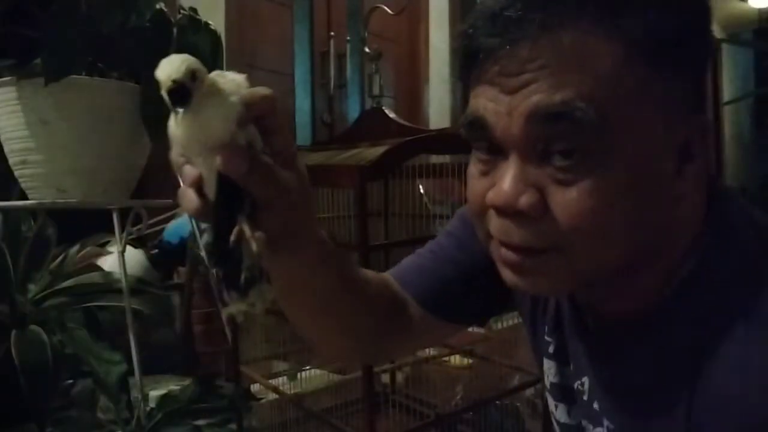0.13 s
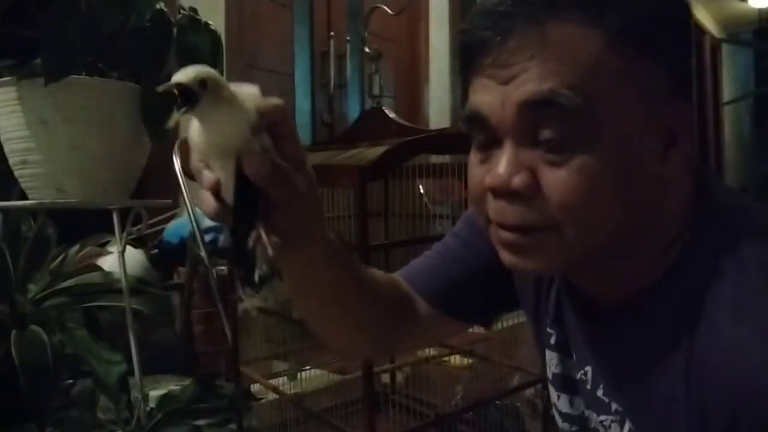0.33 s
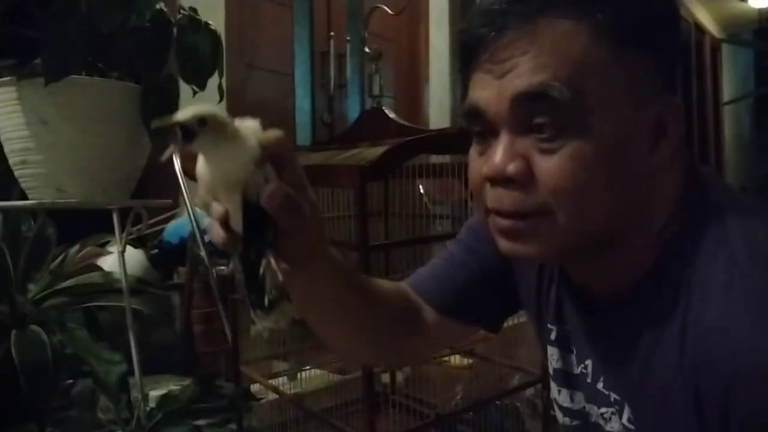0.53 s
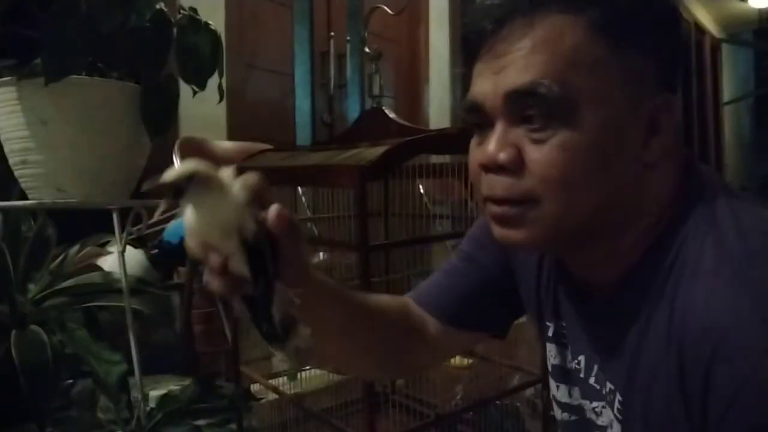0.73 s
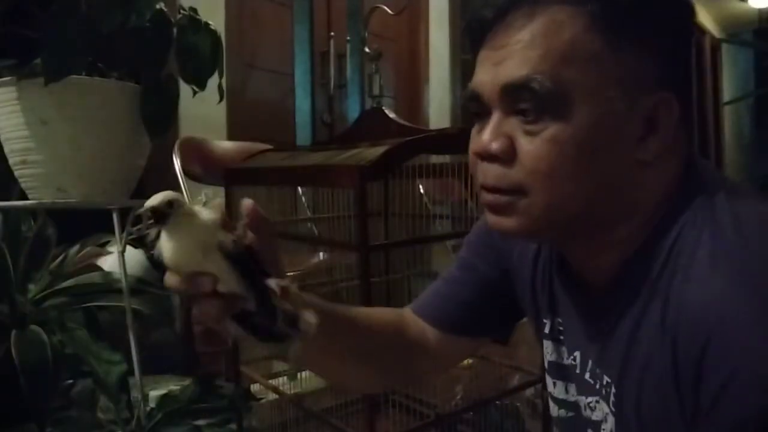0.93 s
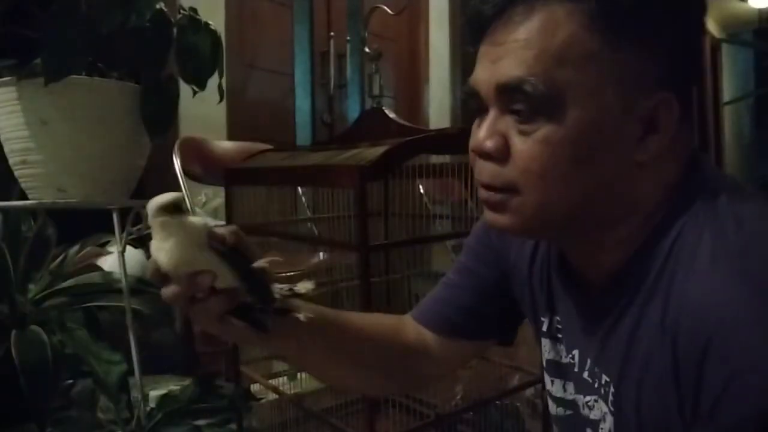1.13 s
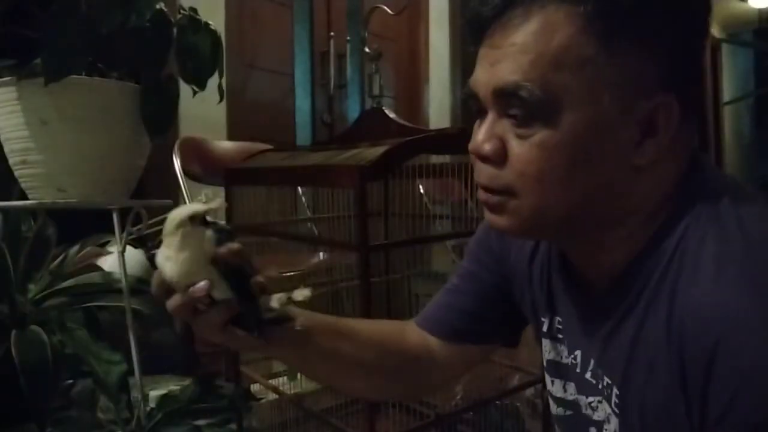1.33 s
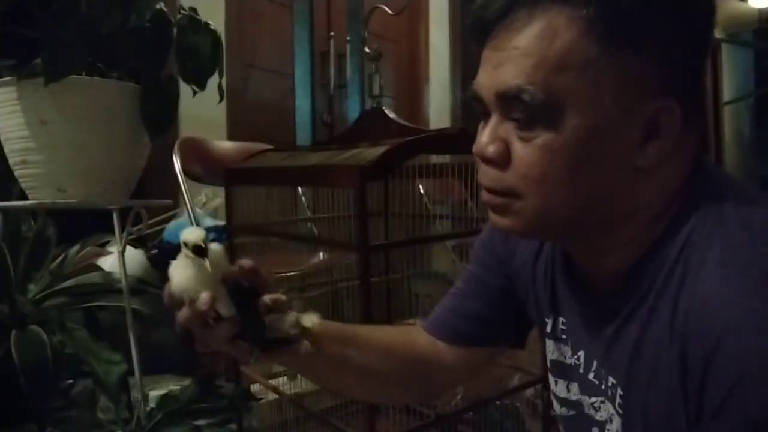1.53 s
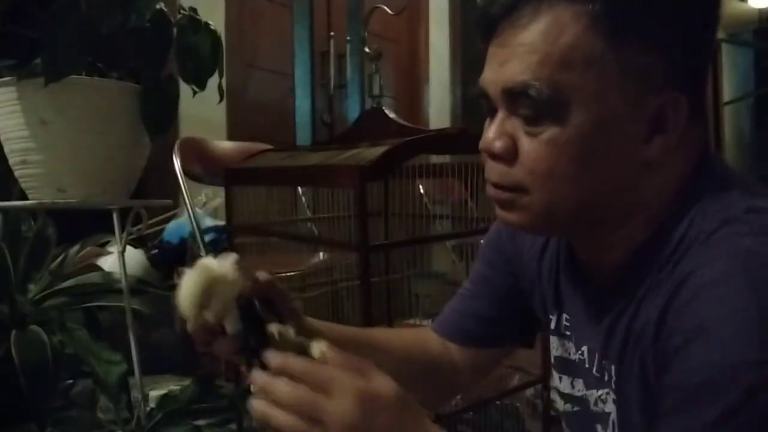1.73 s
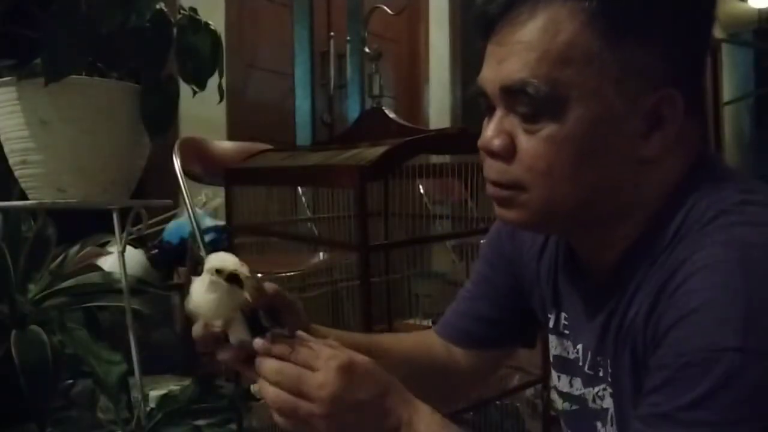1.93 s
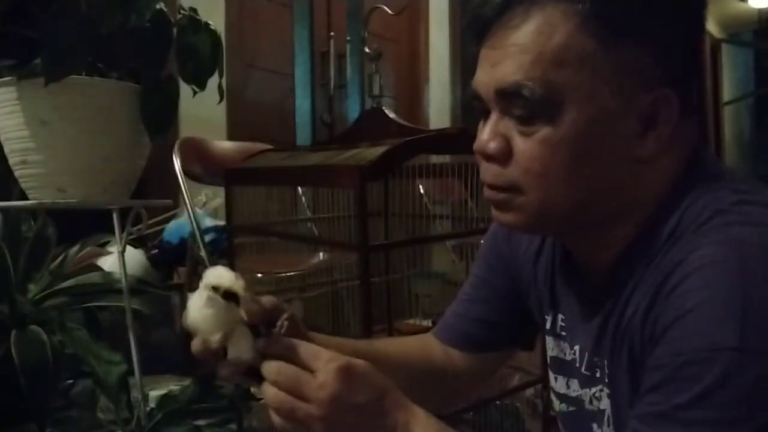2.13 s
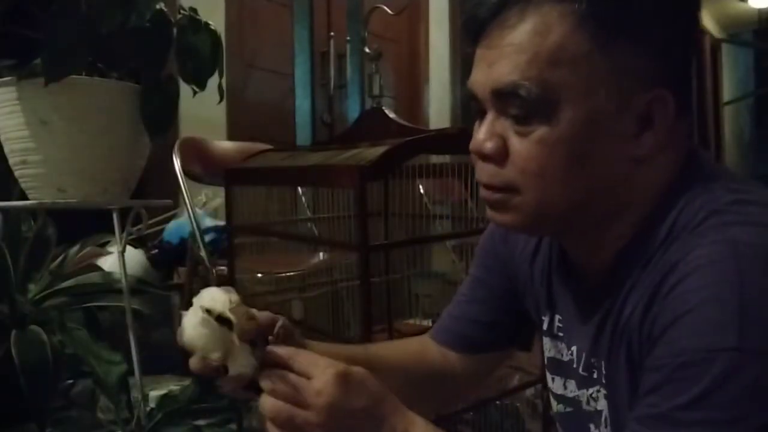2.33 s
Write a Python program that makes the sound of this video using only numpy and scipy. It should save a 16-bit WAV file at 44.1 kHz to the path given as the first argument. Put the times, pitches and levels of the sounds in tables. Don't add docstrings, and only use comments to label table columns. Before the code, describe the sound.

A hand-held myna squawks harshly, close up in a tiled room. At first only soft fan hum, air and hiss, with a feather brush at 0.13 s. From 1.05 s a climbing whistle breaks into a scream at 1.2, growling down until 1.54. A noisy rasp at 1.7 swells into a quavering squawk until 2.1, with beak snaps. A third call starts at 2.34 and is cut off.

```python
import sys
import numpy as np
from scipy import signal
from scipy.fft import rfft, irfft, next_fast_len
from scipy.io import wavfile
from scipy.ndimage import uniform_filter1d, minimum_filter1d, map_coordinates

SR = 44100
rng = np.random.default_rng(int(sys.argv[2]) if len(sys.argv) > 2 else 0)


def unload_audio(sound):
    columns = np.transpose(np.atleast_2d(sound))
    steps = np.round(np.clip(columns, -1, 1) * 32767)
    wavfile.write(sys.argv[1], SR, steps.astype(np.int16))


def magnitude_from_level(level_db):
    exponent = np.asarray(level_db, float) / 20
    return 10 ** exponent


N = 104605


def unit(x):
    return x / np.sqrt(np.mean(x ** 2) + 1e-20)


def along(points, hz):
    f, v = np.transpose(points)
    return np.interp(np.log(hz + 1), np.log(f + 1), v)


def curves(rows):
    s, *cols = np.transpose(sorted(rows))
    return [np.interp(np.arange(N) / SR, s, c) for c in cols]


def wobble(rate):
    return map_coordinates(rng.standard_normal(4000), [np.arange(N) * rate / SR], mode="wrap")


def filtered(x, response):
    m = next_fast_len(N + SR // 2)
    return irfft(rfft(x, m) * response(np.fft.rfftfreq(m, 1 / SR)), m)[..., :N]


# (frequency [Hz], left-right correlation)
LIKENESS = [(60, 0.86), (180, 1), (550, 0.7), (1650, 0.78), (4970, -0.15), (15000, 0.78)]


def rush(spectrum, patchy_db):
    lead_s = 0.00032
    z = signal.stft(rng.standard_normal((2, N)), nperseg=512)[2]
    patches = uniform_filter1d(rng.standard_normal(z.shape[1:]), 4, 0)
    patches = uniform_filter1d(patches, 12, 1)
    pair = signal.istft(z * magnitude_from_level(patchy_db * unit(patches)), nperseg=512)[1][:, :N]

    def mid_side(hz):
        angle = np.arccos(np.clip(along(LIKENESS, hz), -1, 1)) / 2
        return magnitude_from_level(along(spectrum, hz)) * [np.cos(angle), np.sin(angle)]

    def lead(hz):
        return np.exp(1j * np.pi * hz * lead_s * np.array([[1], [-1]]))

    mid, side = filtered(pair, mid_side)
    return unit(filtered(np.array([mid + side, mid - side]), lead))


# (frequency [Hz], level [dB])
FAN_LINES = [(25, -41), (75.4, -59), (193.8, -56), (274.5, -56), (301.5, -58.5), (769.8, -61.5),
             (1050, -68.5), (1486, -65)]
# (frequency [Hz], density [dB/Hz])
TRAFFIC_SPECTRUM = [(24, -40), (40, -8), (49, -12), (183, -12), (322, -15.5), (371, -15), (462, -17),
                    (1700, -21), (2210, -36), (3740, -120)]
# (time [s], level [dB])
TRAFFIC_LEVEL_DB = [(0.0, -42.5), (0.14, -43), (1.13, -43.5), (1.15, -40.5), (1.67, -43), (2.13, -41.5),
                    (2.37, -43.5)]
# (frequency [Hz], density [dB/Hz])
HISS_SPECTRUM = [(1000, -71), (1700, 4), (2930, -4.5), (6260, -11), (7890, -6.5), (11500, -6.5),
                 (12600, -25), (14900, -21), (15400, -50)]


def fan():
    t = np.arange(N) / SR
    waver_db, hiss_db = 3.5, -51
    hum = np.zeros(N)
    for hz, db in FAN_LINES:
        level_db = db + waver_db * wobble(hz / 12 + 2) * (hz > 40)
        hum += magnitude_from_level(level_db) * np.sqrt(2) * np.sin(2 * np.pi * hz * t + 0.47 * wobble(5.17))
    traffic_db, = curves(TRAFFIC_LEVEL_DB)
    traffic = magnitude_from_level(traffic_db + 0.29 * wobble(8.9)) * rush(TRAFFIC_SPECTRUM, patchy_db=1.5)
    return hum + traffic + magnitude_from_level(hiss_db) * rush(HISS_SPECTRUM, patchy_db=0.3)


# (time [s], level [dB], decay [s], frequency [Hz], width [share of it])
BRUSHES = [
    (0.129, -43, 0.035, 1650, .6),
    (0.128, -55, 0.04, 5000, .9),
    (1.197, -43, .015, 1800, .6),
    (2.078, -46, .006, 1290, .4),
    (2.097, -37, 0.006, 1320, .25),
    (2.094, -42, .005, 2100, .5),
    (2.116, -44, .007, 690, .5),
    (1.026, -50, .002, 6000, .7),
]


def rustles():
    t = np.arange(N) / SR
    rise_share = 0.25
    out = np.zeros(N)
    for s, db, decay, hz, width in BRUSHES:
        def resonance(f):
            return (1j * f * hz / (hz * hz - f * f + 1j * width * f * hz)) ** 2

        grain = unit(filtered(rng.standard_normal(N) ** 3, resonance))
        swell = np.exp(-np.abs(t - s) / np.where(t < s, rise_share * decay, decay))
        out += magnitude_from_level(db) * swell * grain
    return out


# (start [s], end [s], n [cycles], depth [rad])
LOCKINGS = [(1.193, 1.218, 2, 0.49), (1.209, 1.274, 3, 0.12), (1.253, 1.395, 2, 0.13),
            (1.415, 1.494, 4, 0.32), (1.738, 1.768, 2, 1), (1.814, 1.857, 4, 0.33), (1.855, 1.937, 3, 0.12),
            (1.946, 2.015, 2, 0.1)]


def locking(phase):
    t = np.arange(N) / SR
    edge_s, waver_db, drift = 0.025, 6, 1.05
    lock = 0
    for start, end, cycles, depth in LOCKINGS:
        gate = np.clip(np.minimum(t - start, end - t) / edge_s + .5, 0, 1)
        lock = lock + depth * gate * np.exp(1j * (phase / np.round(cycles) + drift * wobble(180)))
    return lock * magnitude_from_level(waver_db * wobble(59.86))


def loose_locking(phase):
    burst_db, drift = 5, 1.09
    loose = 0
    for cycles in (2, 3):
        loose = loose + magnitude_from_level(burst_db * wobble(45)) * np.exp(1j * (phase / cycles + drift * wobble(150)))
    return loose / np.std(loose.imag)


def turbulence(chaos_db):
    peak_hz, share, burst_db = 1810, 0.89, 3
    noise = rng.standard_normal((2, N))
    breath = unit(filtered(noise, lambda hz: (hz / peak_hz) ** 2 / (1 + (hz / peak_hz) ** 3)))
    return share * magnitude_from_level(chaos_db + burst_db * wobble(90)) * breath


CLIMB = [(1.052, 3180, -90, 11.5, -34), (1.062, 3215, -37, -14, -34), (1.09, 3310, -41.5, -5, -25),
         (1.138, 3882, -24, -6, -28), (1.17, 3959, -21, -9, -32), (1.198, 3992, -17, -7.5, -30)]
SCREAM_PHASE = [(1.202, 3672, -24.5, -0.064, -19), (1.209, 3699, -18, -1.7, -24.5),
                (1.24, 3708, -20, 0.018, -35), (1.252, 3810, -24, 1, -32), (1.267, 3661, -15, -1.6, -36),
                (1.277, 3680, -20, -1.2, -30), (1.286, 3760, -15, -1.8, -36),
                (1.294, 3793, -15, -0.51, -36), (1.301, 3672, -20.5, 0, -27), (1.307, 3625, -21, 0.16, -19),
                (1.324, 3480, -19, -1.1, -28), (1.378, 3576, -19, -1.6, -31), (1.385, 3566, -17, -1.3, -23),
                (1.395, 3376, -18, -0.73, -19)]
GROWL_PHASE = [(1.401, 3375, -17.5, -5.2, -21), (1.419, 3268, -23, 11, -20), (1.432, 3342, -23.5, .9, -22),
               (1.44, 3328, -19, -2.2, -24), (1.456, 3354, -19.5, 0.5, -17.5), (1.478, 3251, -21, 0.7, -21),
               (1.498, 3106, -18, -6, -26), (1.514, 3124, -18, -6.5, -26), (1.524, 3133, -26, -6.5, -25),
               (1.537, 3110, -36, -5, -9)]
RASP_PHASE = [(1.699, 3173, -51, 4, -16), (1.709, 3221, -35, 7, -11.5), (1.721, 3285, -33, 1.5, -19),
              (1.728, 3420, -36, 9, -4), (1.738, 3751, -34, 8, -4), (1.757, 3693, -33, -1.5, -1.5),
              (1.772, 3283, -30.5, -3.5, -2.5), (1.779, 3211, -31, 1, -6), (1.791, 3213, -24.5, 5, -17),
              (1.796, 3452, -28, 2, 1.5)]
SWELL_PHASE = [(1.806, 3497, -22.5, 1, -8), (1.83, 3580, -22.5, -3.5, -8.5), (1.853, 3640, -24, 3.5, -12),
               (1.873, 3626, -20, 5, -16), (1.893, 3556, -18, -3, -21), (1.901, 3510, -17, -1, -30),
               (1.914, 3513, -18, -4.3, -17.5), (1.935, 3603, -18.5, 6.5, -30),
               (1.955, 3743, -18.5, -5.5, -19)]
QUAVER_PHASE = [(1.96, 3487, -19, -0.5, -36), (1.974, 3394, -16, -1.5, -25), (2.01, 3678, -18, -1, -39),
                (2.022, 3365, -17, -2, -42), (2.061, 3548, -14.5, -3, -38), (2.09, 3264, -19.5, -7.5, -14),
                (2.099, 3106, -24.5, -20, -8)]
THIRD_START = [
    (2.344, 3149, -50, -2, -44),
    (2.352, 3263, -26.5, -21, -19),
    (2.363, 3132, -26.5, -8, -33),
    (2.372, 3220, -27.5, -15, -17),
]
# (time [s], level [dB])
SECOND_PARTIAL = [(1.05, 5), (1.2, 2.5), (1.3, -1.5), (1.39, 2.5), (1.47, 2.5), (1.5, 9), (1.7, 5), (1.79, -16),
                  (1.82, 3), (1.86, 3), (1.9, 0.4), (2.0, -0.1), (2.1, 0), (2.35, 8)]
LOCK_LOUDNESS = [0.051, 0.37, 0.73, 0.34]
LOCK_PHASE = [0.88, 0.81, 1.06, 1]
# (frequency [Hz], level [dB])
THROAT_GAIN = [(1500, -8), (2700, -1), (3700, 1), (4900, -3.5), (6800, 0), (8800, 1), (10400, 1.5),
               (12500, -3), (15500, -18)]


def myna():
    jitter, jitter_rate = .007, 170
    flutter_db, flutter_rate = 1.1, 110
    fourth_db, swing_share, beak_hz = -17, 0.49, 1540
    calls = [CLIMB + SCREAM_PHASE + GROWL_PHASE, RASP_PHASE + SWELL_PHASE + QUAVER_PHASE, THIRD_START]

    def hush(row, gap_s):
        return (row[0] + gap_s, row[1], -150, *row[3:])

    rows = []
    for call in calls:
        rows += [hush(call[0], -0.01628), *[tuple(p) for p in call], hush(call[-1], 0.01597)]
    pitch_hz, level_db, slope_db, chaos_db = curves(rows)
    second_db, = curves(SECOND_PARTIAL)

    phase = 2 * np.pi * np.cumsum(pitch_hz * (1 + jitter * wobble(jitter_rate))) / SR
    lock = locking(phase) + magnitude_from_level(chaos_db) * loose_locking(phase)
    breath = turbulence(chaos_db)
    push = phase + breath[0]
    voice = np.zeros(N)
    for k in range(4):
        partial_db = k * np.minimum(slope_db, 1) + flutter_db * wobble(flutter_rate)
        partial_db = partial_db + fourth_db * (k == 3) + second_db * (k == 1)
        swing = 1 - LOCK_LOUDNESS[k] * (k + 1) * lock.real + swing_share * breath[1]
        voice += magnitude_from_level(partial_db) * swing * np.cos((k + 1) * (push + LOCK_PHASE[k] * lock.imag))

    def throat(hz):
        return magnitude_from_level(along(THROAT_GAIN, hz)) * hz ** 4 / (hz ** 4 + beak_hz ** 4)

    return filtered(np.sqrt(2) * magnitude_from_level(level_db) * voice, throat)


# (time [s], left lead [ms], left over right [dB])
BIRD_PLACE = [(1.05, 0.027, 4.5), (1.18, 0.067, -2), (1.5, 0.079, 1.5), (1.75, 0.044, -2.5),
              (2.1, 0.025, 2), (2.37, 0.043, 2)]


def placed(x):
    lead_ms, pan_db = curves(BIRD_PLACE)
    shift = lead_ms * SR / 2000
    ports = []
    for side in (1, -1):
        moved = map_coordinates(x, [np.arange(N) + side * shift], order=5)
        ports.append(magnitude_from_level(side * pan_db / 2) * moved)
    return np.array(ports)


# (delay [s], level [dB])
WALL_ECHOES = [(.0031, -9.5), (.0057, -10.5), (.0092, -14.5), (.0137, -13.5), (.019, -10.5), (.026, -23.5)]
# (frequency [Hz], time to fall 60 dB [s])
ROOM_DECAY = [(1000, 0.18), (3500, 0.47), (7000, 0.41), (12000, 0.28)]


def room(x):
    tail_db = -15
    hz, t, z = signal.stft(rng.standard_normal((2, SR // 2)), SR, nperseg=256)
    tail = signal.istft(z * magnitude_from_level(-60 * t / along(ROOM_DECAY, hz)[:, None]), SR, nperseg=256)[1]
    answer = magnitude_from_level(tail_db) * np.pad(tail / np.linalg.norm(tail[0]), ((0, 0), (500, 0)))
    skews = rng.integers(-12, 12, len(WALL_ECHOES))
    for (s, db), skew in zip(WALL_ECHOES, skews):
        answer[[0, 1], [round(s * SR) + skew, round(s * SR) - skew]] += magnitude_from_level(db)
    return signal.fftconvolve(x[None], answer, axes=1)[:, :N]


def scene():
    bird = myna() + rustles()
    return placed(bird) + room(bird) + fan()


def limited(x):
    ceiling, span = .84, round(.006 * SR)
    need = np.minimum(1, ceiling / (np.abs(x).max(axis=0) + 1e-9))
    return x * uniform_filter1d(minimum_filter1d(need, 2 * span), span)


# (start [s], end [s], from [Hz], to [Hz])
LOST_BANDS = [(1.07, 1.2, 12500, 14600), (1.2, 1.32, 12100, 13700), (1.2, 1.295, 13700, 14500),
              (1.315, 1.7, 14500, 16000), (1.32, 1.365, 12800, 13600), (1.41, 1.6, 13500, 14500),
              (1.853, 2.14, 11460, 13400), (1.853, 1.99, 13400, 14000), (1.853, 1.88, 14000, 16000),
              (1.965, 2.14, 14300, 16000), (2.06, 2.14, 13400, 14300)]


def thinned(x):
    floor_db, masked_db, mask_hz, top_hz = -130, -32, 1000, 15730
    hz, t, z = signal.stft(x, SR, nperseg=1024)
    f = hz[:, None]
    band = np.sqrt(np.abs(uniform_filter1d(np.abs(z) ** 2, size=7, axis=1)))
    loudest_near = -minimum_filter1d(-band, round(2 * mask_hz / hz[1]), axis=1)
    lost = np.zeros(z.shape[1:], bool)
    for start, end, low, high in LOST_BANDS:
        lost |= (t > start) & (t < end) & (f > low) & (f < high)
    audible = (band > magnitude_from_level(masked_db) * loudest_near) & (band > magnitude_from_level(floor_db))
    keep = audible & ~lost & (f < top_hz)
    return signal.istft(z * keep, SR, nperseg=1024)[1][:, :N]


def roll_off(x):
    return signal.sosfilt(signal.butter(12, 15730, fs=SR, output="sos"), x)


def record(dry):
    mix = thinned(limited(dry))
    return roll_off(mix)


dry = scene()
out = record(dry)
unload_audio(out)
```